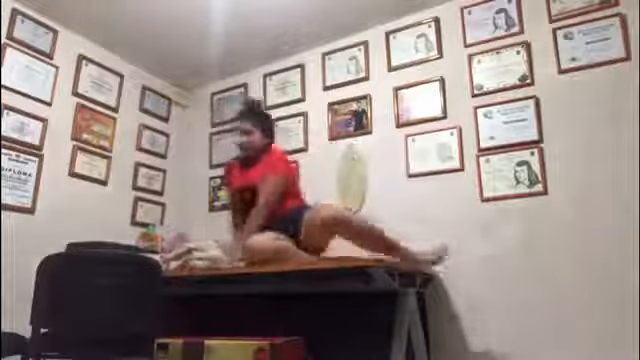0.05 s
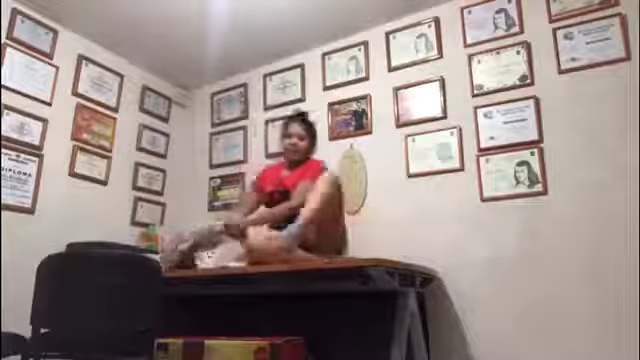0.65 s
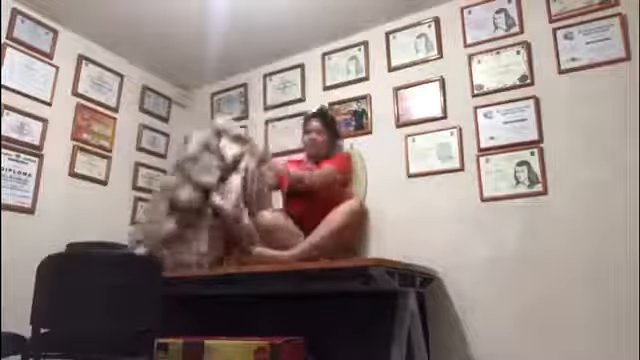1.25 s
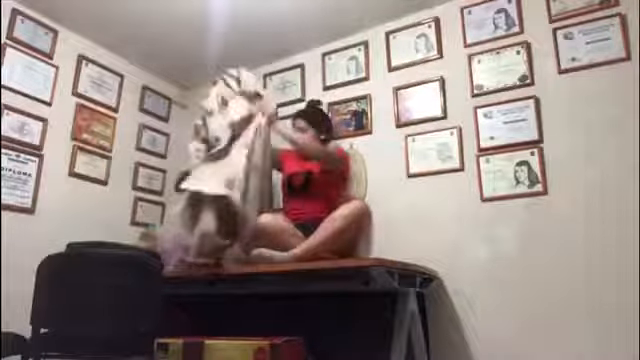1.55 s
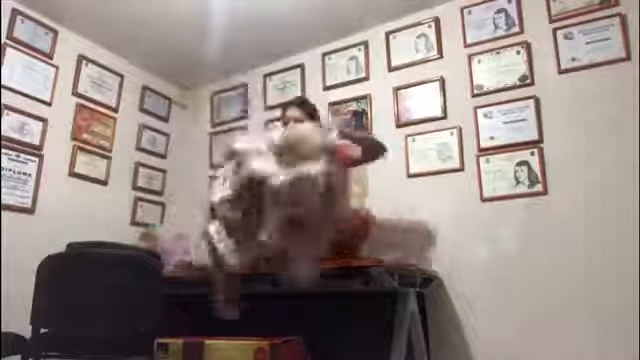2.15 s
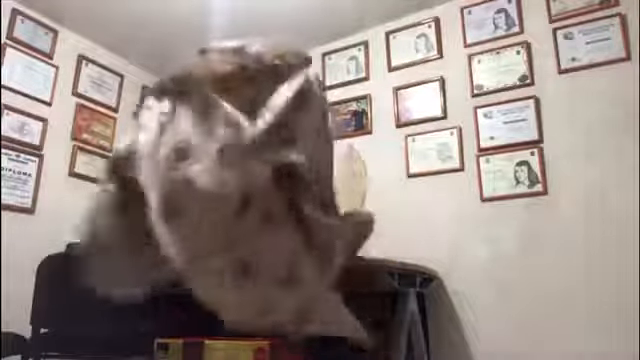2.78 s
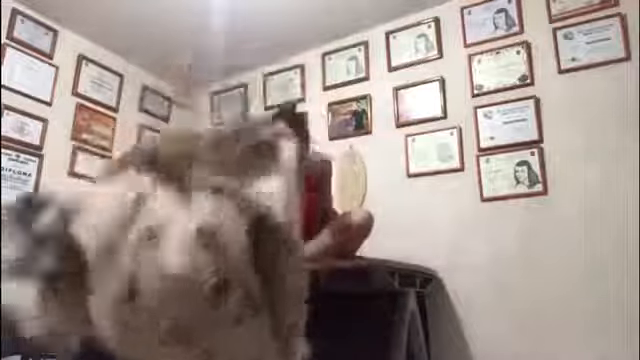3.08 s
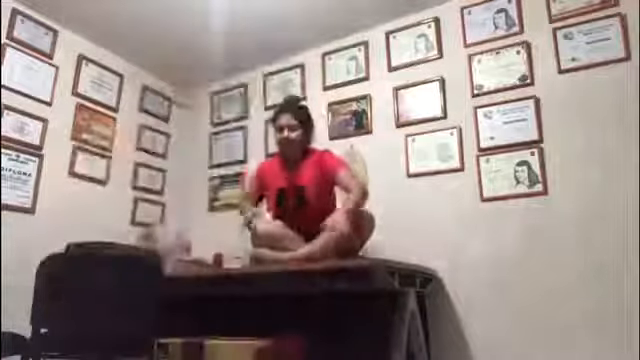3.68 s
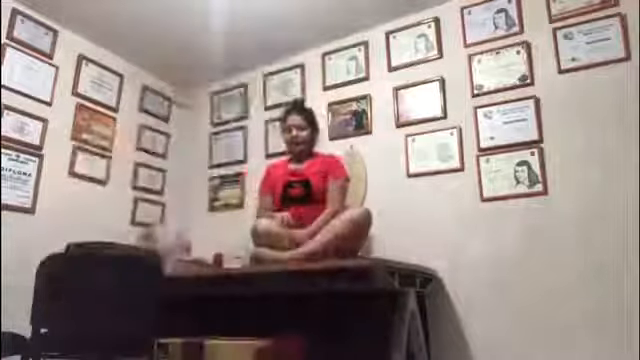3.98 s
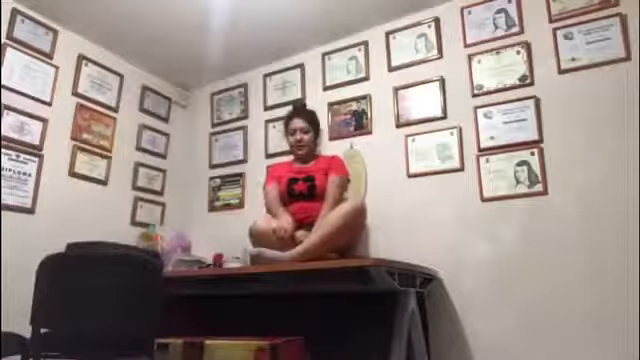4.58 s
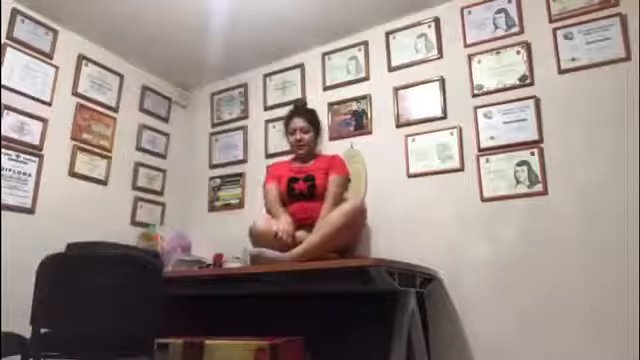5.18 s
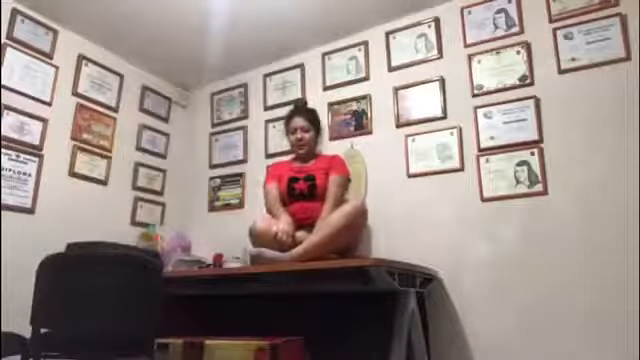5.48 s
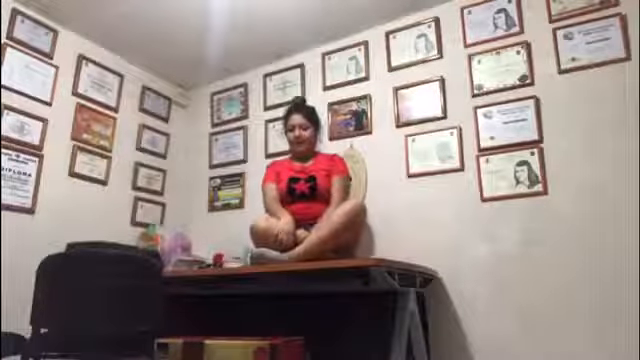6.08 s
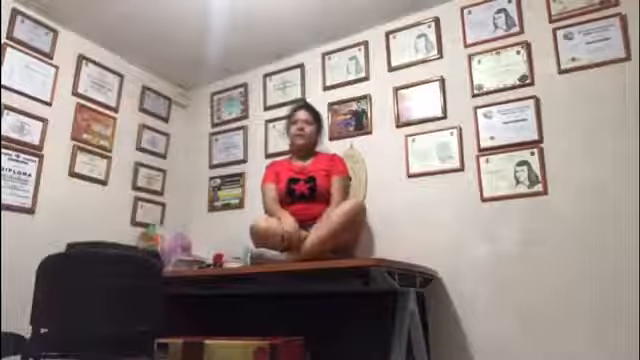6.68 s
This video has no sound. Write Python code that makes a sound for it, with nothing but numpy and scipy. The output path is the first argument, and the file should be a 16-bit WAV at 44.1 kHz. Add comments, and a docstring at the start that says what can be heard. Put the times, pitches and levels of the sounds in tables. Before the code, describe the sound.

Someone shifts on a wooden desk in a small, quiet office. The desk rocks with hollow knocks and low booms, its joints creak, and skin rubs on the varnish. A blanket rustles as it is gathered, then swishes through the air and flops down close to the microphone. Another quick run of knocks follows before everything settles into faint creaks and a low room hush.

```python
"""Rocking desk and thrown blanket

Someone settles on a wooden desk in a small, quiet office. The desk rocks onto its feet: each knock
rings the panels, and the heavy top booms and sways. Joints creak; skin and cloth stick and slip on
the varnish. A blanket rustles as it is gathered, pushes air as it swings, and flops down close by."""
import sys
import numpy as np
from scipy import signal
from scipy.fft import rfft, irfft, next_fast_len
from scipy.io import wavfile

SR = 44100
rng = np.random.default_rng(int(sys.argv[2]) if len(sys.argv) > 2 else 0)


def master_out(mix):
    """Clip the mix to full scale and print it as 16-bit PCM to the path in sys.argv[1]."""
    frames = np.transpose(np.atleast_2d(mix))
    ceiling = np.clip(frames, -1, 1)
    pcm = np.round(ceiling * 32767).astype(np.int16)
    wavfile.write(sys.argv[1], SR, pcm)


N = 301423
T = np.arange(N) / SR

# office background (frequency [Hz], relative density [dB])
HUSH_SPECTRUM = [(18, -28), (30, -17), (59, 6.5), (112, 0), (199, -2.5), (362, -6), (430, -8.5), (625, -8),
                 (1460, -14), (2850, -20), (6490, -22.5), (11500, -27.5), (15000, -74), (22000, -120)]
# sitter's movement, busy to still (time [s], level [dB])
MOVEMENT = [(0.0, 1), (1.3, -1), (1.9, -7), (4.4, -5.5), (4.9, -16.5), (5.9, -11.5), (6.15, -29),
            (6.83, -32)]
# weight on the joints (peak time [s], rise [s], fall [s], creak level [dB])
JOINT_LEANS = [(.21, 0.6, 0.29, -50.5), (.86, 0.15, 0.48, -43.5), (2.51, 0.4, 0.13, -55.5),
               (5.55, 0.61, 0.82, -74.5)]
# colour of the creak (frequency [Hz], gain [dB])
JOINT_SPECTRUM = [(150, -5), (400, -1), (750, -4), (1050, -3), (1500, -2), (2500, -5), (6000, 0)]
# stick-slip on varnish (time [s], length [s], pitch [Hz], width [Hz], level [dB])
VARNISH_RUBS = [(0.086, 0.07, 338, 40.5, -54.5), (0.162, 0.089, 425, 70, -46), (0.174, 0.14, 225, 25, -49),
                (0.899, 0.082, 620, 31, -44.5), (0.951, 0.073, 1000, 70, -44.5),
                (0.977, 0.067, 4100, 1300, -55.5), (1.019, 0.18, 604, 25, -59.5),
                (1.146, 0.28, 4070, 1800, -55), (1.226, 0.21, 2570, 600, -56.5),
                (5.282, 0.49, 1093, 90, -68.5)]
# cloth on cloth (peak time [s], rise [s], fall [s], relative level [dB])
CLOTH_STROKES = [(.19, 0.1, 0.19, -63.5), (.35, .04, 0.053, -65.5), (.52, 0.041, 0.047, -73),
                 (.9, 0.19, 0.25, -62), (1.24, 0.22, 0.27, -56), (1.83, 0.18, 0.047, -76),
                 (1.96, 0.027, 0.069, -76), (2.11, 0.025, 0.4, -78.5), (2.915, 0.027, 0.083, -61.5),
                 (3.04, 0.13, 0.071, -65.5), (3.26, 0.036, .1, -67.5), (3.52, 0.89, 0.27, -77.5),
                 (4.52, 0.15, 0.26, -74)]
# cloth hiss (frequency [Hz], relative density [dB])
CLOTH_SPECTRUM = [(200, 7.5), (600, 6.5), (1300, 11.5), (2500, 4), (4200, 4.5), (6000, 1), (9000, -1),
                  (11500, -7.5)]
# air pushed by the blanket (time [s], level [dB])
SWING_LEVEL = [(2.86, -77), (2.93, -58), (3.04, -54), (3.11, -65.5), (3.22, -105)]
# colour of that air (frequency [Hz], relative density [dB])
SWING_SPECTRUM = [(50, -6), (80, -16), (140, -2), (330, 0), (600, -15), (1200, -11), (2500, -31),
                  (8000, -30.5)]
# folds landing (time [s], relative level [dB])
FOLD_LANDINGS = [(3.427, -4), (3.452, -10), (3.474, 2.5)]
# room ring after a fold (frequency [Hz], relative density [dB], t60 [s])
FOLD_RING = [(90, 8, 0.17), (170, 6, 0.49), (300, 0.5, 0.36), (547, -6, 0.36), (800, -15.5, 0.61),
             (1220, -12, 0.34), (2210, -51, .2), (8000, -50, .2)]
# low modes of the top (frequency [Hz], relative level [dB], t60 [s])
TOP_MODES = [(50.5, -36, 1), (74.1, 2, 0.41), (94.8, 2, 0.12)]
# panel modes (frequency [Hz], relative level [dB], t60 [s])
PANEL_MODES = [(216.2, -6, 0.34), (315.8, -7.5, 0.49), (355.1, -5.5, 0.34), (389.7, -4.5, 0.26),
               (426, -11.5, 0.22), (513, -3.5, 0.16), (600.4, -3.5, 0.23), (671.5, -1, 0.19),
               (786, -15, 0.41), (850, -27, 0.24), (940, 1.5, 0.19), (991.3, -0.5, 0.22), (1072, -5.5, 0.2),
               (1101, -5, 0.18), (1159, -5, 0.15), (1300, -2.5, 0.16), (1451, 3, 0.16), (1585, -8, 0.081),
               (1878, -13, 0.4), (1925, -6, 0.19), (2080, -10, 0.21), (2357, -13, 0.29)]
# crack of a foot (frequency [Hz], relative level [dB], t60 [s])
FOOT_MODES = [(1140, -5.5, 0.087), (1592, 2.5, 0.039), (1907, -6, 0.016), (4650, -15.5, 0.029)]
# dense ring of desk and room (frequency [Hz], relative density [dB], t60 [s])
WOOD_RING = [(138, -4.5, 0.6), (300, -3.5, 0.34), (550, -3, 0.26), (796, -7.5, 0.2), (1174, 3.5, 0.34),
             (1600, -7.5, 0.23), (2180, -9, 0.4), (2780, -14.5, 0.22), (3600, -14.5, 0.29),
             (5500, -24.5, 0.21), (7450, -33, 0.34), (11500, -41, 0.19)]
# limbs striking the top (time [s], relative boom [dB], sway [dB])
LIMB_THUDS = [(0.068, 0, -29), (0.105, -3, -33), (0.803, -3.5, -34.5), (2.950, -22, -50), (3.48, -15, -36),
              (4.58, -23, -61)]
# feet landing, and one brief swell of desk creak at 1.11 s
# (time [s], relative ring [dB], relative boom [dB], hardness [dB/octave], response [0 or 1])
DESK_JOLTS = [(.155, -15.5, -21, 1.5, 1), (.180, -12, -7, 1, 1), (.256, -3.5, -3.5, -0.5, 0),
              (.497, -31.5, -35, 7.5, 0), (.687, -3, -0.5, 0.5, 0), (.833, -4.5, -9, -1.5, 0),
              (.864, -7, -2, -5, 1), (.915, -3.5, -10, -2, 0), (1.110, -15.5, -13, -2, 0),
              (1.231, -1.5, -14, -1.5, 0), (1.249, -8, 1, 3, 1), (1.508, -8.5, -8, -1.5, 1),
              (2.382, 0.5, 0.5, 2.5, 1), (2.655, -20, -20, 0.5, 1), (3.257, -17.5, -16, 0.5, 0),
              (3.56, -21.5, -28, 2, 0), (3.66, -16.5, -17.5, 1.5, 0), (3.825, -8, -8.5, -2, 0),
              (3.894, -3, -4.5, 0.5, 0), (3.970, -1.5, -2, 0.5, 0), (4.045, -1.5, -1.5, 0, 0),
              (4.268, -1, -2.5, -0.8, 0), (5.331, -29, -35, 1, 0), (5.383, -29.5, -41, 1, 0),
              (5.858, -29.5, -31, -9.5, 1)]


def from_db(db):
    return 10 ** (np.asarray(db) / 20)


def rms_one(x):
    return x / np.sqrt(np.mean(x ** 2) + 1e-20)


def unit_energy(x):
    return x / np.sqrt(np.sum(x ** 2) + 1e-20)


def add(out, time_s, sound):
    start = max(round(time_s * SR), 0)
    out[start:start + len(sound)] += sound[:N - start]


def gain_curve(rows):
    """Gain per sample from (time [s], level [dB]); silent outside."""
    times_s, db = np.transpose(rows)
    return from_db(np.interp(T, times_s, db, left=-120, right=-120))


def swells(rows):
    """Gain of gestures summed in power; 20 dB per rise or fall time."""
    power = 0
    for peak_s, rise_s, fall_s, db in rows:
        distance = np.maximum((peak_s - T) / rise_s, (T - peak_s) / fall_s)
        power = power + from_db(db - 20 * np.minimum(distance, 10)) ** 2
    return np.sqrt(power)


def at_hz(table, hz, column=1):
    """Table column interpolated over log frequency."""
    table = np.array(table)
    return np.interp(np.log(hz + 1), np.log(table[:, 0]), table[:, column])


def coloured(x, spectrum):
    """Signal shaped by a spectrum; rms 1."""
    size = 2 * len(x)
    gain = from_db(at_hz(spectrum, np.fft.rfftfreq(size, 1 / SR)))
    return rms_one(irfft(rfft(x, size) * gain)[:len(x)])


def noise(spectrum):
    return coloured(rng.standard_normal(next_fast_len(N)), spectrum)[:N]


def grains(per_s, spread_db):
    """Random clicks of uneven size."""
    sizes = from_db(spread_db * np.minimum(rng.exponential(1, N), 4))
    return (rng.random(N) < per_s / SR) * sizes * rng.choice([-1, 1], N)


def wavering_tone(hz, width_hz, size=N):
    """Noise through a narrow double resonance, level evened; rms 1."""
    pole = np.exp((2j * hz - width_hz) * np.pi / SR)
    band = signal.lfilter([1], np.poly([pole, pole]), rng.standard_normal(size + SR))[SR:]
    return rms_one(np.real(band / (abs(band) + 0.38 * np.std(band))))


def decay(t60_s):
    return np.exp(-np.log(1000) * T[:SR] / t60_s)


def onset(build_s):
    return 1 - np.exp(-T[:SR] / build_s)


def modal_ring(modes, weights):
    """Decaying sines from (frequency [Hz], level [dB], t60 [s]); unit energy."""
    return unit_energy(sum(weight * from_db(db) * np.sin(2 * np.pi * hz * T[:SR]) * decay(t60_s)
                           for weight, (hz, db, t60_s) in zip(weights, modes)))


def dense_ring(table, build_cycles):
    """Overlapping modes as third-octave noise bands that build, lows last, and decay."""
    out = 0
    edges_hz = np.geomspace(80, 12500, 23)
    for low_hz, high_hz in zip(edges_hz, edges_hz[1:]):
        hz = np.sqrt(low_hz * high_hz)
        band_pass = signal.butter(2, [low_hz, high_hz], "band", fs=SR, output="sos")
        band = signal.sosfilt(band_pass, rng.standard_normal(2 * SR))[SR:]
        envelope = onset(build_cycles / hz) * decay(at_hz(table, hz, column=2))
        gain = from_db(at_hz(table, hz)) * np.sqrt(high_hz - low_hz)
        out = out + gain * unit_energy(band * envelope)
    return unit_energy(out)


def office_hush(level_db):
    """Steady, mostly low room noise."""
    return from_db(level_db) * noise(HUSH_SPECTRUM)


def desk_rumble(gain_db):
    """Small movements stir the top's main boom mode."""
    return from_db(gain_db) * gain_curve(MOVEMENT) * wavering_tone(hz=TOP_MODES[1][0], width_hz=19.4)


def desk_sway(idle_db, jolt_feed_db, build_s, hold_s, fall_db_per_s):
    """The loaded top trembles near its lowest mode: slightly with movement, widely after blows."""
    t = T[:2 * SR]
    envelope = (1 - np.exp(-t / build_s)) * from_db(-fall_db_per_s * np.maximum(t - hold_s, 0))
    power = (from_db(idle_db) * gain_curve(MOVEMENT) ** 0.61) ** 2
    for time_s, _, sway_db in LIMB_THUDS:
        add(power, time_s, (from_db(sway_db) * envelope) ** 2)
    for time_s, _, boom_db, _, _ in DESK_JOLTS:
        add(power, time_s, (from_db(boom_db + jolt_feed_db) * envelope) ** 2)
    return np.sqrt(power) * wavering_tone(hz=53.23, width_hz=9.1)


def joint_creak(response, idle_db):
    """Tiny slips in the joints ring the panels, louder under a lean."""
    slips = signal.fftconvolve(grains(per_s=220, spread_db=5), response)[:next_fast_len(N)]
    load = np.hypot(swells(JOINT_LEANS), from_db(idle_db) * gain_curve(MOVEMENT))
    return load * coloured(slips, JOINT_SPECTRUM)[:N]


def varnish_rubs():
    """Skin and cloth stick and slip in short, rough tones."""
    out = np.zeros(N)
    for time_s, length_s, hz, width_hz, db in VARNISH_RUBS:
        size = int(length_s * SR)
        tone = wavering_tone(hz, width_hz, size=SR)[:size]
        add(out, time_s, from_db(db) * np.hanning(size) * tone)
    return out


def blanket_rustle(gain_db, linger_s, idle_db):
    """Fibres catch and release; each puff of hiss lingers in the room."""
    catches = grains(per_s=1100, spread_db=4)
    power = signal.lfilter([1], [1, -np.exp(-1 / (linger_s * SR))], catches ** 2)
    sliding = np.hypot(swells(CLOTH_STROKES), from_db(idle_db) * gain_curve(MOVEMENT))
    return from_db(gain_db) * sliding * rms_one(np.sqrt(power) * noise(CLOTH_SPECTRUM))


def blanket_throw(ring_db, slap_db, whump_at_s, whump_hz, whump_t60_s, whump_db):
    """Swung cloth pushes air; each fold slaps and rings the room; the bulk lands in a whump."""
    out = gain_curve(SWING_LEVEL) * noise(SWING_SPECTRUM)
    slap = -modal_ring([(190, -1, 0.02), (490, 0, 0.021)], [1, 1])
    for time_s, fold_db in FOLD_LANDINGS:
        fold = from_db(slap_db) * slap + from_db(ring_db) * dense_ring(FOLD_RING, build_cycles=0.3)
        add(out, time_s, from_db(fold_db) * fold)
    add(out, whump_at_s, from_db(whump_db) * modal_ring([(whump_hz, 0, whump_t60_s)], [1]))
    return out


def scuffs(low_cut_hz, rise_s, fall_s, gain_db):
    """Short, bright hiss with each jolt; at a knock, the foot sliding on the floor."""
    gain = swells([(time_s + rise_s, rise_s, fall_s, ring_db + gain_db)
                   for time_s, ring_db, *_ in DESK_JOLTS])
    low_cut = signal.butter(2, low_cut_hz, "high", fs=SR, output="sos")
    return gain * rms_one(signal.sosfilt(low_cut, noise(CLOTH_SPECTRUM)))


def foot_response(panel_db, crack_db, leg_hz, leg_width_hz, leg_db):
    """The foot cracks, panels and room ring; the leg stresses one band."""
    panels = modal_ring(PANEL_MODES, rng.choice([-1, 1], len(PANEL_MODES))) * onset(build_s=0.012)
    crack = modal_ring(FOOT_MODES, [1, -1, 1, 1]) * onset(build_s=0.003)
    wood = dense_ring(WOOD_RING, build_cycles=6.9)
    ring = from_db(crack_db) * crack + from_db(panel_db) * panels + wood
    leg = signal.lfilter(*signal.iirpeak(leg_hz, leg_hz / leg_width_hz, fs=SR), ring)
    return unit_energy(ring + from_db(leg_db) * leg)


def harden(ring, db_per_octave):
    """Harder contact tilts the ring towards the treble."""
    hz = np.fft.rfftfreq(2 * SR, 1 / SR)
    octaves = np.log2(np.maximum(hz, 700) / 1100)
    return irfft(rfft(ring, 2 * SR) * from_db(db_per_octave * octaves))[:SR]


def desk_jolts(responses, boom_lag_s, gain_db):
    """Knocks and one swell of creak ring the panels; these and limb thuds boom the top just after."""
    out = np.zeros(N)
    boom = modal_ring(TOP_MODES, [1, 1, -1])  # opposed modes swell over a few cycles
    for time_s, ring_db, boom_db, db_per_octave, which in DESK_JOLTS:
        add(out, time_s, from_db(ring_db) * harden(responses[int(which)], db_per_octave))
        add(out, time_s + boom_lag_s, from_db(boom_db) * boom)
    for time_s, boom_db, _ in LIMB_THUDS:
        add(out, time_s + boom_lag_s, from_db(boom_db) * boom)
    return from_db(gain_db) * out


def scene():
    """Desk, rubs and blanket over the office hush; mono."""
    feet = [foot_response(panel_db=0.5, crack_db=-5.5, leg_hz=1030, leg_width_hz=115, leg_db=-2),
            foot_response(panel_db=0, crack_db=-4, leg_hz=331, leg_width_hz=23, leg_db=-1.5)]
    desk = desk_jolts(feet, boom_lag_s=0.0102, gain_db=-2)
    desk += scuffs(low_cut_hz=4960, rise_s=0.0057, fall_s=0.041, gain_db=-63.5)
    desk += joint_creak(feet[0], idle_db=-65)
    desk += desk_sway(idle_db=-57.5, jolt_feed_db=-52.5, build_s=0.066, hold_s=0.1, fall_db_per_s=97)
    desk += desk_rumble(gain_db=-56)
    blanket = blanket_throw(ring_db=-9.5, slap_db=-17,
                            whump_at_s=3.497, whump_hz=98, whump_t60_s=0.091, whump_db=-5.5)
    blanket += blanket_rustle(gain_db=8.5, linger_s=0.014, idle_db=-77)
    return (desk + varnish_rubs() + blanket + office_hush(level_db=-67.5))[None]


def record(dry):
    """Small microphone: deepest bass lost, top treble cut."""
    low_cut_hz, high_cut_hz = 33, 11800
    low_cut = signal.butter(2, low_cut_hz, "high", fs=SR, output="sos")
    high_cut = signal.ellip(10, 0.3, 70, high_cut_hz, fs=SR, output="sos")
    thin = signal.sosfilt(low_cut, signal.sosfilt(low_cut, dry))
    return signal.sosfilt(high_cut, thin)


dry = scene()
out = record(dry)
master_out(out)
```